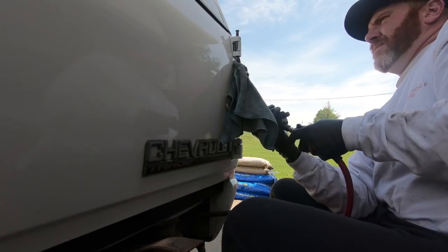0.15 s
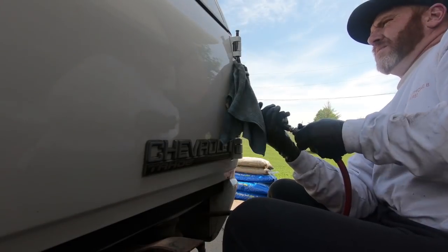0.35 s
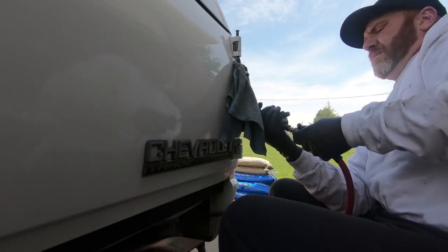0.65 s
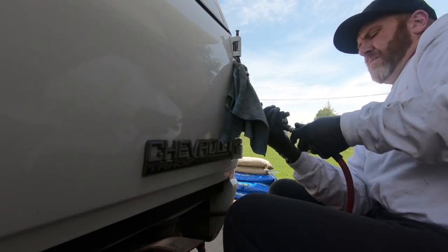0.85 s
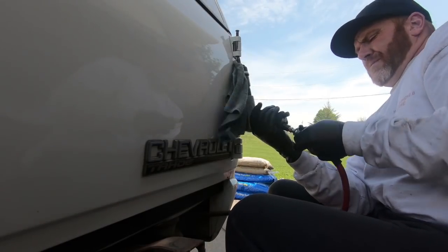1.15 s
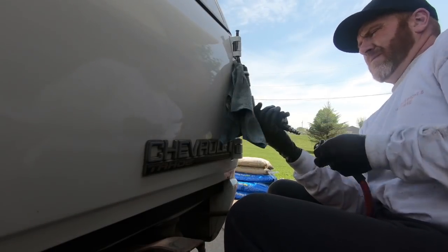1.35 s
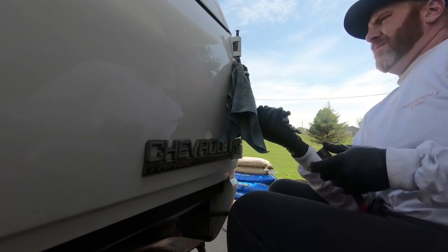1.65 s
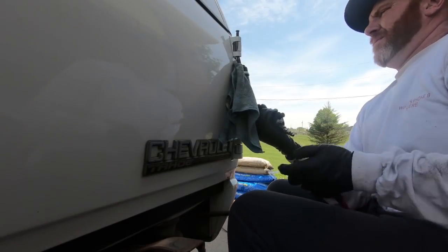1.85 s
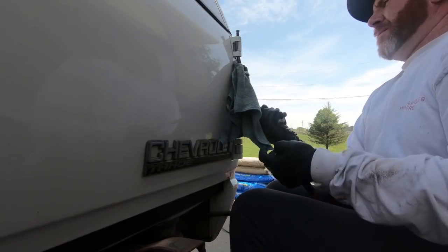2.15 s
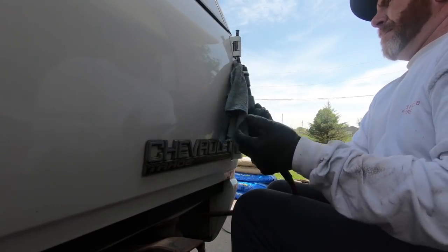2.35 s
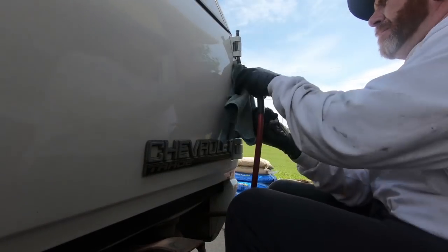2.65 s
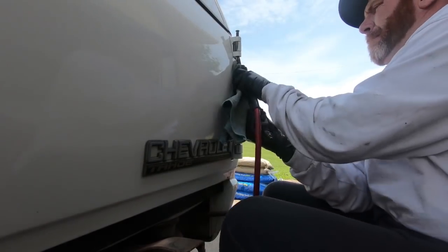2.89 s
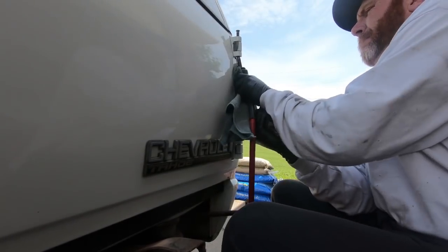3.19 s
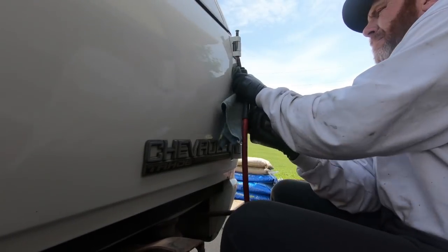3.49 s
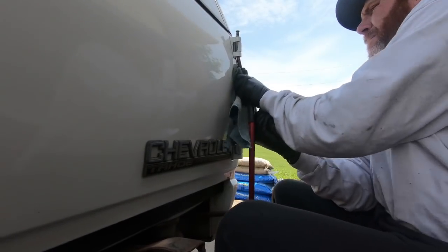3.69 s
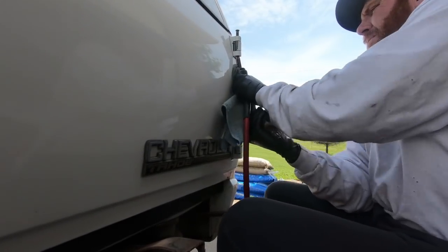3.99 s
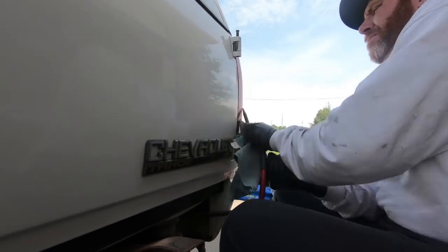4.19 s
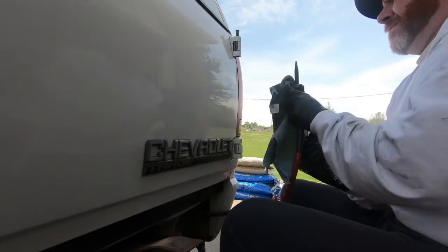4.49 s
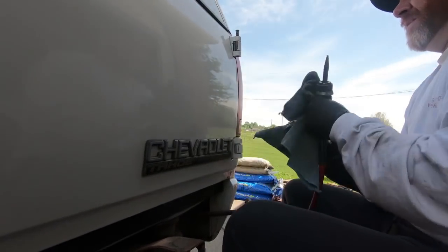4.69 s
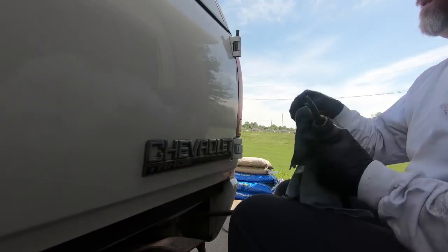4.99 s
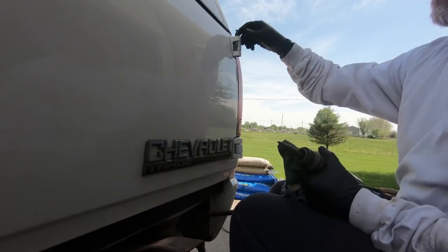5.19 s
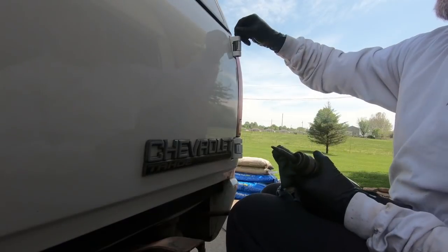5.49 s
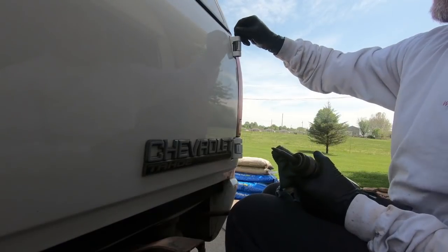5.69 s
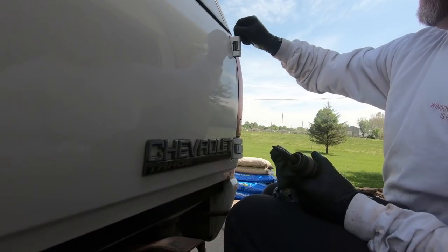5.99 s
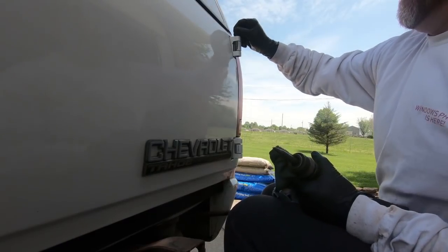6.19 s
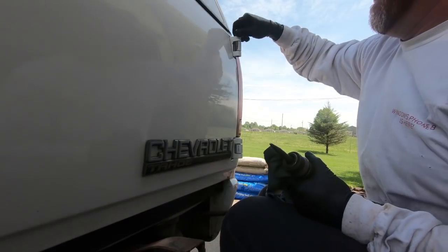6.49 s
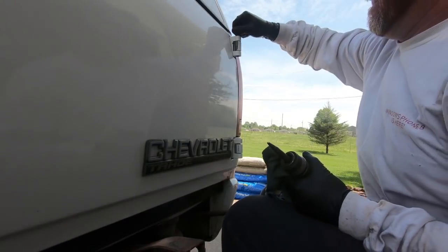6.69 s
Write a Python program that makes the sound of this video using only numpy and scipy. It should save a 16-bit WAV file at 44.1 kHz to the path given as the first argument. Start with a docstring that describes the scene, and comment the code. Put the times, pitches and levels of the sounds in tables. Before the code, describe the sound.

Close outdoors beside a van's rear door, a bright compressed-air leak hisses and pulses with a metallic whistle, bursts briefly and cuts off just after one second. Low wind buffeting then dominates, with dry ticks, faint rubs and cloth rustle. A loud hollow door knock comes at three seconds, then sharper knocks and steel clinks around four, before only gusty wind remains.

```python
"""A pulsing hiss outdoors beside a van's rear door: compressed air leaks from an air hammer wrapped in a rag.
The leak is shaped noise ringing in ports and barrel; it bursts once and is shut off. The tool is then shifted:
door knocks, door rubs and steel clinks are decaying modes and noise. Rag and gloves rustle in noise. Gusty
wind, low noise under level curves, buffets the microphone throughout; a wall nearby answers diffusely."""
import sys
import numpy as np
from scipy import signal
from scipy.fft import rfft, irfft, next_fast_len
from scipy.io import wavfile
from scipy.ndimage import uniform_filter1d, minimum_filter1d, map_coordinates

SR = 44100
rng = np.random.default_rng(int(sys.argv[2]) if len(sys.argv) > 2 else 0)


def digitize_waveform(pressure):
    """Quantize a signal to 16-bit integers and store it at the path in sys.argv[1].

    Rows of a 2-D input are taken as channels; values are limited to [-1, 1].
    """
    field = np.atleast_2d(pressure).T
    bounded = np.clip(field, -1, 1)
    quanta = np.round(bounded * 32767).astype(np.int16)
    wavfile.write(sys.argv[1], SR, quanta)


N = 302066


def amp(db):
    """Decibels to amplitude ratio."""
    return 10 ** (np.asarray(db) / 20)


def unit(x):
    """Scales x to rms 1."""
    return x / np.sqrt(np.mean(x ** 2) + 1e-20)


def along(points, hz):
    """Interpolates (Hz, value) points on a log frequency axis."""
    f, v = np.transpose(points)
    return np.interp(np.log(hz + 1), np.log(f + 1), v)


def curves(rows):
    """One value per sample for each column after the time."""
    s, *cols = np.transpose(rows)
    return [np.interp(np.arange(N) / SR, s, c) for c in cols]


def wobble(knots_per_s):
    """A smooth random curve through normally distributed knots."""
    knots = rng.standard_normal(int(N * knots_per_s / SR) + 4)
    return map_coordinates(knots, [np.arange(N) * knots_per_s / SR])


def filtered(x, response):
    """Multiplies the spectrum of x by a response of frequency."""
    m = next_fast_len(x.shape[-1] + SR // 2)
    spectrum = rfft(x, m) * response(np.fft.rfftfreq(m, 1 / SR))
    return irfft(spectrum, m)[..., :x.shape[-1]]


def table(spectrum):
    """Amplitude response of (Hz, dB) points."""
    return lambda hz: amp(along(spectrum, hz))


def modes(rows):
    """Causal response of (Hz, width Hz, dB) resonances, alternating in sign."""
    def response(f):
        total = 0
        for k, (centre, width, db) in enumerate(rows):
            total = total + (-1) ** k * amp(db) * 1j * f * width / (centre ** 2 - f ** 2 + 1j * f * width)
        return total
    return response


def noise(response, patchy_db=0):
    """Coloured noise of rms 1, optionally with random gain patches in time and frequency."""
    x = rng.standard_normal(N)
    if patchy_db:
        z = signal.stft(x, nperseg=512)[2]
        field = uniform_filter1d(rng.standard_normal(z.shape), size=6, axis=0)
        field = uniform_filter1d(field, size=8, axis=1)
        x = signal.istft(z * amp(patchy_db * unit(field)), nperseg=512)[1][:N]
    return unit(filtered(x, response))


def dying(t60s, level_db, seconds):
    """A noise burst in which each frequency decays at its own rate; energy 1."""
    hz, t, z = signal.stft(rng.standard_normal(int(seconds * SR)), SR, nperseg=128)
    decay_db = level_db(hz)[:, None] - 60 * t / t60s(hz)[:, None]
    x = signal.istft(z * amp(decay_db), SR, nperseg=128)[1]
    return x / np.linalg.norm(x)


def add(track, s, x):
    """Mixes x into track from time s."""
    part = track[round(s * SR):][:len(x)]
    part += x[:len(part)]


def arches(middle_s, length_s, db, power):
    """Power-summed level curve of events that each swell and fade as a cosine arch."""
    u = (np.arange(N) / SR - np.c_[middle_s]) / np.c_[length_s]
    arch = np.cos(np.pi * np.clip(u, -.5, .5)).clip(0) ** power
    return np.sqrt(np.sum((amp(np.c_[db]) * arch) ** 2, axis=0))


# Jet noise spectrum. Each row: frequency in Hz, relative density in dB.
JET_SPECTRUM = [(88, -19.5), (150, -16), (501, -12.5), (1410, -19), (1640, -9.5), (1920, -10.5), (2720, -9),
                (3060, -15.5), (4350, 0.5), (5930, -16.5), (10600, -11.5), (11700, -15.5), (15700, -19)]
# Exhaust port resonances. Each row: frequency in Hz, width in Hz, relative level in dB.
PORT_MODES = [(1940, 400, -8), (4400, 480, 0), (6920, 450, -11), (8810, 500, -7), (10600, 800, -3)]
# Thin steel barrel modes kept ringing by the air. Each row: frequency in Hz, width in Hz, level in dB.
BARREL_MODES = [(2595, 2.5, 2), (4457, 2.4, -12), (5200, 3, 2), (6998, 3.5, -5), (7311, 5, -10)]
# Air leak, pulsing as the rag flaps over the ports. Each row: time in seconds, level in dB.
LEAK_LEVEL = [(0.0, -15), (0.132, -17), (0.16, -20), (0.226, -15.5), (0.36, -19.5), (0.434, -16),
              (0.522, -17), (0.644, -23.5), (0.738, -14), (0.794, -20.5), (0.912, -16), (0.992, -18),
              (1.03, -24), (1.055, -24.5)]
# Last burst as the coupling parts. Each row: time in s, level in dB, port whistle in dB, brightness in dB.
BURST_LEVEL = [(1.059, -11.5, 3, 0.73), (1.065, -14.5, 4.5, 2.5), (1.151, -15.5, 4, 4.5),
               (1.197, -26.5, -19, 2.5), (1.215, -48, -2, -12.5)]
LEAK_MID_DB, WHISTLE_DB, BRIGHT_DB = -17, 3.5, 0.03  # whistle and brightness at the mid level
WHISTLE_DB_PER_DB, BRIGHT_LOSS_DB_PER_DB = .6, .3  # per dB of leak level
JET_SPLIT_HZ = 6000


def leak():
    """Turbulent jet noise; part of it rings in the exhaust ports and in the steel barrel."""
    rows = []
    for s, db in LEAK_LEVEL:
        over_db = db - LEAK_MID_DB
        whistle = WHISTLE_DB + WHISTLE_DB_PER_DB * over_db
        rows.append((s, db, whistle, BRIGHT_DB - BRIGHT_LOSS_DB_PER_DB * over_db))
    level_db, whistle_db, bright_db = curves(rows + list(BURST_LEVEL))
    low = noise(lambda f: table(JET_SPECTRUM)(f) * (f < JET_SPLIT_HZ), patchy_db=2.5)
    high = noise(lambda f: table(JET_SPECTRUM)(f) * (f >= JET_SPLIT_HZ), patchy_db=1.24)
    jet = amp(-4.5 - bright_db) * low + amp(-3 + bright_db) * high  # a narrower gap makes the jet brighter
    jet = jet + amp(whistle_db - 9) * noise(modes(PORT_MODES), patchy_db=2.2)
    is_open = np.arange(N) < BURST_LEVEL[-1][0] * SR
    jet = is_open * amp(level_db + 0.2 * wobble(49)) * jet
    return jet + filtered(jet, modes(BARREL_MODES))


# Spectrum of the burst's air at the microphone. Each row: frequency in Hz, relative density in dB.
BLAST_SPECTRUM = [(60, -12), (130, 0), (300, -2.5), (600, -21), (1200, -60)]
BLAST_RE_BURST_DB = -21.5


def blast():
    """Low noise of escaping air brushing the microphone while the burst lasts."""
    start_s, end_s = BURST_LEVEL[0][0], BURST_LEVEL[-1][0] + .05
    before = [(0, -120, 0, 0), (start_s, -120, 0, 0)]
    level_db = curves(before + list(BURST_LEVEL[1:]) + [(end_s, -120, 0, 0)])[0]
    return amp(level_db + BLAST_RE_BURST_DB + 2.5 * wobble(30)) * noise(table(BLAST_SPECTRUM))


# Knocks and a few rubs (1.938, 2.522, 3.436 s) on the door skin; # at 3.001 s a faint noise swelling in just
# before the loud knock at 3.021 s. # Each row: time in s, peak in dB, hardness in dB per octave, rise time in
# ms.
DOOR_SOUNDS = [(1.612, -32, -1, 1.1), (1.753, -38, -2, 5.4), (1.902, -43.5, -6.5, 3.8),
               (1.938, -34, -6.5, 4), (2.163, -37, 0, 4), (2.266, -39, 0.43, 3.3), (2.522, -38, -1.5, 6),
               (2.865, -44, 0.2, 3.1), (3.001, -33, 4.5, 4.2), (3.021, -5.5, 2.5, 1.2),
               (3.287, -37.5, -3.5, 1.1), (3.436, -36, -0.1, 7), (3.65, -45, 1.1, 3.8),
               (3.78, -44.5, -3, 4.2), (3.812, -21, 2.5, .6), (4.058, -26.5, -1.5, 2.7),
               (4.072, -12.5, 4.5, 1.7), (4.187, -27, 6.5, 3), (4.539, -49.5, 7.5, 2.3)]
# Low modes of the skin. Each row: frequency in Hz, relative level in dB, t60 in s before the ring factor.
SKIN_MODES = [(245, -4, .12), (400, -11, .1), (560, -3, .08), (650, -8, .07), (820, -3, .06),
              (910, 3, .075), (1090, -1, .055), (1420, -12, .04), (1640, -13, .04), (2330, -15, .04),
              (2880, -13, .04), (3420, -16, .035)]
# Dense upper modes of the skin. Each row: frequency in Hz, relative density in dB.
CRASH_SPECTRUM = [(120, -15.5), (200, 5), (728, -11.5), (909, 1.5), (1440, -35), (1550, -7), (2420, -25),
                  (2860, -15), (5350, -32.5), (14200, -37), (16500, -63)]
# Their decay. Each row: frequency in Hz, t60 in s before the ring factor.
CRASH_DECAY = [(200, 0.25), (1000, 0.21), (4000, 0.079), (12000, 0.019)]
RING_FACTOR_0DB, RING_FACTOR_PER_DB = .92, .008  # quieter sounds ring shorter
MODES_0DB_DB, MODES_DB_PER_DB, MODES_LOSS_DB_PER_HARDNESS = 5, 0.22, 1.2  # low modes against the crash


def door_sounds():
    """Knocks and rubs sound the sheet's low modes and a crash of upper ones; low hardness dulls the treble."""
    out, t = np.zeros(N), np.arange(SR // 3) / SR
    for s, db, hard, rise_ms in DOOR_SOUNDS:
        tilt_db = lambda hz: hard * np.log2((hz + 100) / 1000)
        ring = max(RING_FACTOR_0DB + RING_FACTOR_PER_DB * db, .1)
        rings = np.zeros(len(t))
        for hz, level_db, t60 in SKIN_MODES:
            mode_db = level_db + tilt_db(hz) + rng.normal(0, 1)
            rings += amp(mode_db - 60 * t / (t60 * ring)) * np.sin(2 * np.pi * hz * t)
        crash_t60 = lambda hz: ring * along(CRASH_DECAY, hz)
        crash_db = lambda hz: along(CRASH_SPECTRUM, hz) + tilt_db(hz)
        crash = dying(crash_t60, crash_db, 1 / 3)[:len(t)]
        crash = np.pad(crash, (0, len(t) - len(crash)))
        share = amp(MODES_0DB_DB + MODES_DB_PER_DB * db - MODES_LOSS_DB_PER_HARDNESS * max(hard, 0))
        sound = share * rings / np.linalg.norm(rings) + crash
        sound = sound * (1 - np.exp(-1000 * t / max(rise_ms, .2)))
        add(out, s, amp(db) * sound / np.abs(sound).max())
    return out


def tick(db, centre_hz, sharp):
    """A few milliseconds of noise around one frequency, scaled to its peak."""
    t = np.arange(SR // 20) / SR
    band = signal.tf2sos(*signal.iirpeak(centre_hz, max(sharp, .5), SR))
    burst = amp(-60 * t / 0.0087) * rng.standard_normal(len(t))
    x = signal.sosfilt(np.vstack([band, band]), burst)
    return amp(db) * x / np.abs(x).max()


def steel_ring(rows, t):
    """Decaying sines of (Hz, dB, t60 s) modes, each contact varying level and pitch."""
    out = np.zeros(len(t))
    for hz, db, t60 in rows:
        level = amp(db + rng.normal(0, 2.5) - 60 * t / t60)
        out += level * np.sin(2 * np.pi * hz * rng.normal(1, .006) * t)
    return out


# Dry ticks of gloves, hose and coupling. Each row: time in s, peak in dB, centre in Hz, Q (at least 0.5 used).
DRY_TICKS = [(1.254, -30, 3520, 5.3), (1.256, -34, 1960, 1), (1.37, -47.5, 13000, 4.1),
             (1.394, -41, 12000, 6.6), (1.612, -44.5, 5970, 0.82), (1.729, -50.5, 6060, 0.73),
             (1.776, -43, 7000, 0.46), (1.94, -45.5, 4000, 1.5), (2.147, -41, 5000, 1),
             (2.191, -46, 2480, 5.4), (2.235, -25, 4360, 0.31), (2.38, -54.5, 6080, 0.88),
             (2.80, -47, 4540, 1.7), (2.865, -52, 4900, 0.95), (2.90, -43, 7000, 1.7),
             (2.92, -46, 7900, 1.5)]
# Steel contacts inside the tool.
# Each row: time in s, tick peak in dB, tick centre in Hz, chisel ring gain in dB, spring ring gain in dB.
STEEL_CONTACTS = [(4.066, -26, 6000, -34, -37), (4.075, -12.5, 5030, -27, -42.5),
                  (4.108, -39, 5000, -57, -45), (4.127, -38, 9000, -57, -43.5),
                  (4.142, -31, 4000, -57, -56), (4.188, -31, 4000, -60, -46), (4.263, -48, 6040, -53, -62),
                  (4.285, -53, 8000, -46, -62), (4.399, -50.5, 4390, -71, -56),
                  (4.408, -51, 4400, -72, -47), (4.42, -56, 6000, -65, -49), (4.436, -45, 9000, -51, -51),
                  (4.448, -32, 5000, -47, -45), (4.478, -47, 8000, -66, -54)]
# Chisel modes. Each row: mean frequency in Hz, mean relative level in dB, t60 in s.
CHISEL_MODES = [(6950, 0, .09), (8400, -1, .05)]
# Retainer spring modes. Each row: mean frequency in Hz, mean relative level in dB, t60 in s.
SPRING_MODES = [(1940, -2, .07), (4400, 0, .05), (10140, -3, .06), (10550, -9, .035)]


def clinks():
    """Dry ticks of filtered noise; at steel contacts chisel and spring ring on."""
    out, t = np.zeros(N), np.arange(SR // 5) / SR
    for s, db, centre_hz, sharp in DRY_TICKS:
        add(out, s, tick(db, centre_hz, sharp))
    for s, tick_db, centre_hz, chisel_db, spring_db in STEEL_CONTACTS:
        add(out, s, tick(tick_db, centre_hz, 1.0))
        chisel = amp(chisel_db) * steel_ring(CHISEL_MODES, t)
        add(out, s, chisel + amp(spring_db) * steel_ring(SPRING_MODES, t))
    return out


OVERHANG_S, ARCH_POWER = 0.027, 1.9  # swell past both ends of an eddy; power of its cosine arch


def thumps(rows):
    """Level curve of (start s, length s, dB) eddies."""
    s, length, db = np.transpose(rows)
    return arches(s + length / 2, length + 2 * OVERHANG_S, db, ARCH_POWER)


# Wind between the buffets. Each row: time in s, slow heave in dB, murmur in dB.
WIND_LEVEL = [(0, -26.5, -36), (.8, -26.5, -41.5), (1.05, -14, -33.5), (1.35, -36.5, -44),
              (1.52, -26.5, -43), (1.64, -14, -30), (2.15, -19, -33), (2.75, -13.5, -32),
              (3.18, -18.5, -27.5), (3.32, -35.5, -42), (3.45, -15.5, -31), (3.7, -11, -29),
              (4.0, -23, -35), (4.44, -11.5, -29.5), (4.9, -14, -28.5), (5.05, -28, -41), (5.3, -7, -26.5),
              (5.45, -22.5, -27.5), (6.0, -20, -30), (6.4, -9.5, -30), (6.65, -21, -31.5),
              (6.85, -13, -28.5)]
# Big eddies thumping on the diaphragm. Each row: start in s, length in s without overhang, level in dB.
BIG_EDDIES = [(1.583, 0.069, -16), (1.643, 0.027, -21), (1.71, 0.036, -19.5), (2.007, 0.13, -18),
              (2.272, 0.1, -17), (2.479, 0.17, -12), (2.778, 0.22, -13.5), (3.01, 0.19, -10),
              (3.23, 0.036, -21.5), (3.41, 0.11, -12.5), (3.56, 0.068, -18.5), (3.643, 0.037, -22),
              (3.703, 0.084, -16.5), (3.844, 0.08, -14), (4.099, 0.092, -14.5), (4.409, 0.062, -15.5),
              (4.482, 0.045, -18.5), (4.611, 0.06, -15), (4.745, 0.092, -21), (5.116, 0.095, -14),
              (5.24, 0.12, -15.5), (5.444, 0.172, -11), (5.669, 0.054, -21.5), (6.118, 0.044, -18),
              (6.356, 0.082, -17.5), (6.419, 0.032, -21.5), (6.481, 0.035, -21.5), (6.592, 0.06, -11.5)]
# Small, quick eddies. Each row: start in s, length in s without overhang, level in dB.
SMALL_EDDIES = [(1.58, .04, -33), (1.643, .046, -25.5), (1.695, .03, -29), (2.03, 0.057, -27.5),
                (2.256, .058, -26.5), (2.45, .06, -22), (2.51, 0.037, -27.5), (2.593, .066, -28),
                (2.77, 0.044, -27), (2.82, .09, -18), (3.04, .05, -15), (3.11, .08, -17.5),
                (3.414, 0.091, -20.5), (3.66, .07, -24), (3.765, 0.04, -18), (3.84, .07, -22),
                (4.099, .046, -25.5), (4.47, 0.045, -24.5), (4.62, 0.037, -25), (4.69, .03, -26),
                (4.75, .04, -27), (5.14, .07, -19.5), (5.27, .07, -15.5), (5.45, .04, -20),
                (5.51, .09, -15.5), (5.91, .04, -30), (6.12, .05, -30), (6.38, .05, -19.5),
                (6.49, .04, -22), (6.6, .05, -25.5), (6.79, .05, -23)]
MURMUR_FLUTTER_DB = -6  # flutter's share of the murmur


def buffets():
    """Strength of throb and of flutter: a murmur, and the thumps above it."""
    murmur = amp(curves(WIND_LEVEL)[1])
    throb = np.hypot(murmur, thumps(BIG_EDDIES))
    flap = np.hypot(murmur * amp(MURMUR_FLUTTER_DB), thumps(SMALL_EDDIES))
    return throb, flap


def eddies(spectrum, seconds):
    """Low noise of evened strength, leaving the level to the gust curves."""
    x = noise(table(spectrum))
    envelope = np.abs(signal.hilbert(x, next_fast_len(N))[:N])
    strength = uniform_filter1d(envelope, size=int(seconds * SR))
    return unit(x / (strength + 0.073))


# Slow heave spectrum. Each row: frequency in Hz, relative density in dB.
HEAVE_SPECTRUM = [(1.5, -21.5), (4, 16.5), (14, 20.5), (22, -2.5), (40, -68), (80, -160)]
# Throb spectrum. Each row: frequency in Hz, relative density in dB.
THROB_SPECTRUM = [(5, -84), (10, -24), (20, 14), (35, 14.5), (52, -1.5), (90, -64.5), (160, -160)]
# Flutter spectrum. Each row: frequency in Hz, relative density in dB.
FLUTTER_SPECTRUM = [(25, -39), (52, 11.5), (78, -3.5), (120, -12.5), (250, -38), (500, -52), (1200, -80.5),
                    (3000, -100), (6000, -160)]


def wind():
    """Eddies push on the diaphragm: a slow heave, a throb and lumps of flutter."""
    throb, flap = buffets()
    flutter = unit(amp(2.2 * wobble(22)) * eddies(FLUTTER_SPECTRUM, 0.039))
    heave = amp(curves(WIND_LEVEL)[0] + 1.4 * wobble(4.9)) * eddies(HEAVE_SPECTRUM, 0.079)
    throbbing = throb * amp(1.0 * wobble(14)) * eddies(THROB_SPECTRUM, 0.076)
    return heave + throbbing + flap * flutter


# Far leaves and cloth at rest. Each row: time in s, soft rustle in dB, crisp rustle in dB.
REST_RUSTLE = [(1.2, -59, -57.5), (1.6, -62, -66), (2.5, -61.5, -67.5), (2.97, -55.5, -66),
               (3.25, -64, -75.5), (3.8, -61.5, -70), (4.3, -58.5, -61.5), (5.1, -63, -68.5),
               (5.7, -65.5, -76.5), (6.4, -62, -69.5), (6.85, -63, -75.5)]
# Rubs of rag and gloves. Each row: middle in s, length in s, soft level in dB, crisp level in dB.
CLOTH_RUBS = [(2.18, 0.14, -52.5, -68), (2.402, 0.11, -60.5, -64), (2.564, 0.095, -54.5, -78),
              (2.787, .08, -58, -76), (2.897, 0.12, -62, -62), (3.455, 0.064, -53.5, -66.5),
              (3.863, 0.22, -54, -74), (4.15, 0.18, -42.5, -49), (4.257, .1, -51.5, -53),
              (4.435, 0.08, -60, -56.5)]
# Soft rustle spectrum. Each row: frequency in Hz, relative density in dB.
SOFT_SPECTRUM = [(150, -17), (250, 1), (446, -9.5), (546, -6), (787, -11), (1340, -16.5), (2500, -26.5),
                 (3250, -49), (5500, -120)]
# Crisp rustle spectrum. Each row: frequency in Hz, relative density in dB.
CRISP_SPECTRUM = [(900, -62.5), (1500, -1.5), (2500, 0.5), (3800, 2), (4350, 4), (5200, -3.5), (7000, -6.5),
                  (11000, -9), (15800, -25.5)]
SPILL_DB, SPILL_POWER = -32, 1.355  # hard flutter shakes rag and microphone cover: soft rustle against it


def rustle():
    """Cloth noise comes in small uneven rubs, the crisp part in grains."""
    soft_db, crisp_db = curves(REST_RUSTLE)
    s, length, rub_soft_db, rub_crisp_db = np.transpose(CLOTH_RUBS)
    spill = amp(SPILL_DB) * buffets()[1] ** SPILL_POWER
    rub = wobble(25)
    soft = unit(amp(1.2 * rub + 1.2 * wobble(12)) * noise(table(SOFT_SPECTRUM), patchy_db=1.8))
    crisp = unit(amp(1.5 * rub + 2.4 * wobble(110)) * noise(table(CRISP_SPECTRUM), patchy_db=1.2))
    soft_level = amp(soft_db) + spill + arches(s, length, rub_soft_db, power=1)
    crisp_level = amp(crisp_db) + arches(s, length, rub_crisp_db, power=0.61)
    return soft_level * soft + crisp_level * crisp


# Decay of the wall's answer. Each row: frequency in Hz, t60 in s.
WALL_DECAY = [(200, .35), (2000, .5), (5000, .6), (9000, .45), (15000, .22)]


def wall(x):
    """The yard's diffuse answer: x convolved with a decaying noise tail after 600 samples."""
    tail = dying(lambda hz: along(WALL_DECAY, hz), lambda hz: 0 * hz, .7)
    return signal.fftconvolve(np.pad(x, (600, 0)), tail)[:N]


# Microphone's own noise. Each row: frequency in Hz, relative density in dB.
HISS_SPECTRUM = [(1000, -40), (3000, -1.5), (15000, -4)]


def hiss():
    """The microphone's own steady noise."""
    return amp(-81) * noise(table(HISS_SPECTRUM))


def scene():
    """Sums all sources in the centre; leak, door sounds and clinks also feed the wall."""
    air, door, clink = leak(), door_sounds(), clinks()
    echoes = wall(amp(-22) * air + amp(-20.5) * door + amp(-24) * clink)
    mid = air + door + clink + echoes + wind() + rustle() + hiss() + blast()
    return np.array([mid, mid])


# Stereo difference. Each row: frequency in Hz, side against mid in dB.
SIDE_LEVEL = [(120, -30), (250, -20), (500, -22), (1000, -23), (2000, -21), (4400, -20), (8000, -19),
              (15000, -21)]
LIMIT, SIDE_SPLIT_HZ, TOP_HZ = .75, 120, 15850  # limit in full-scale amplitude


def record(dry):
    """A limiter holds the peaks, a faint side signal parts the channels, a steep low-pass ends the band."""
    need = LIMIT / np.maximum(np.abs(dry[0]), LIMIT)
    hold = minimum_filter1d(need, size=2601)
    gain = uniform_filter1d(uniform_filter1d(hold, size=1301), size=1301)
    mid = dry[0] * gain
    side_source = filtered(mid, lambda f: table(SIDE_LEVEL)(f) * (f > SIDE_SPLIT_HZ))
    z = signal.stft(side_source, nperseg=256)[2]
    random_phase = np.exp(2j * np.pi * rng.random(z.shape))
    side = signal.istft(z * random_phase, nperseg=256)[1][:N]
    # quadrature bass: the channels differ there only slightly in phase
    side = side + amp(-47) * filtered(mid, lambda f: 1j * (f <= SIDE_SPLIT_HZ))
    return filtered(np.array([mid + side, mid - side]), lambda f: 1 / (1 + (f / TOP_HZ) ** 300))


dry = scene()
out = record(dry)
digitize_waveform(out)
```